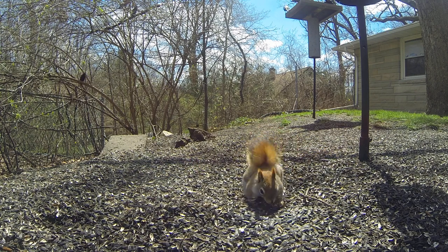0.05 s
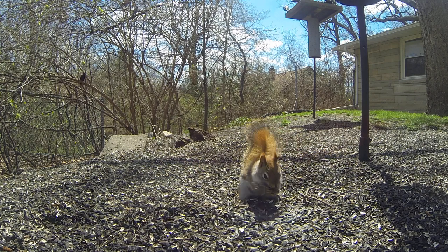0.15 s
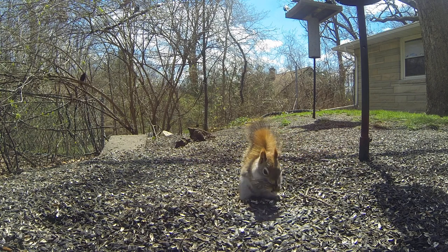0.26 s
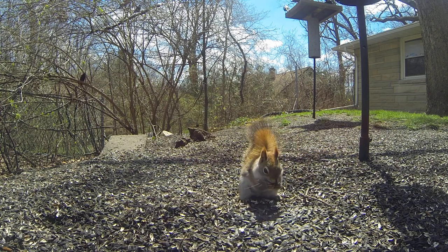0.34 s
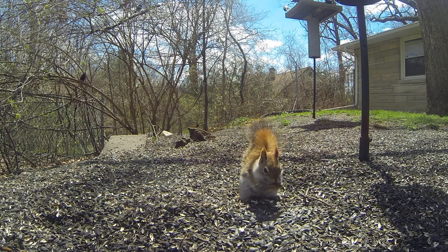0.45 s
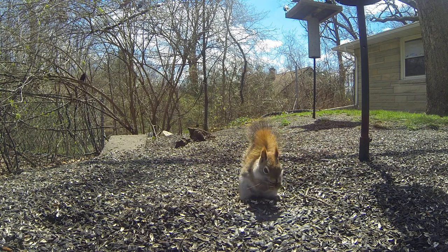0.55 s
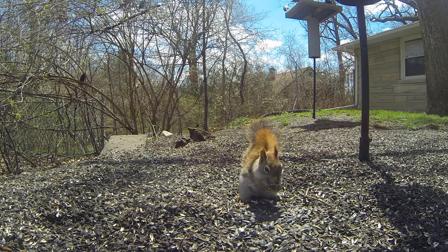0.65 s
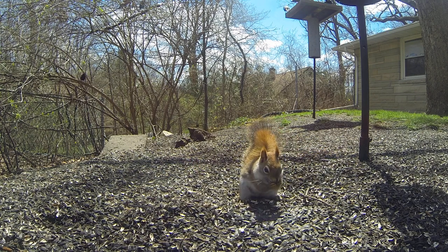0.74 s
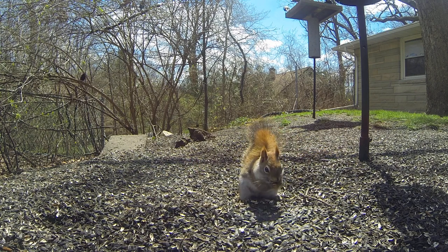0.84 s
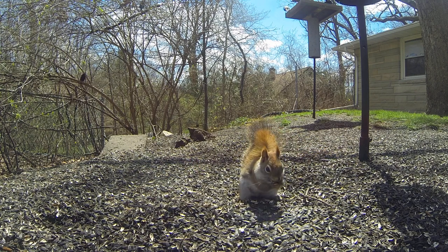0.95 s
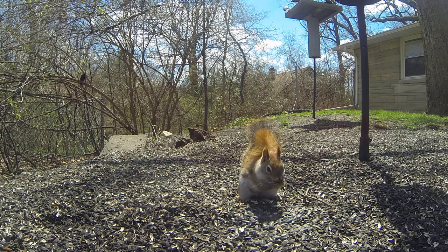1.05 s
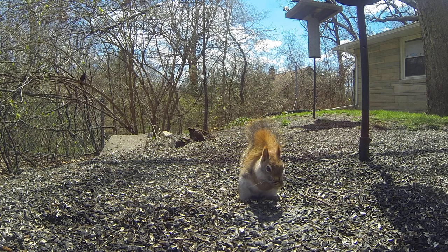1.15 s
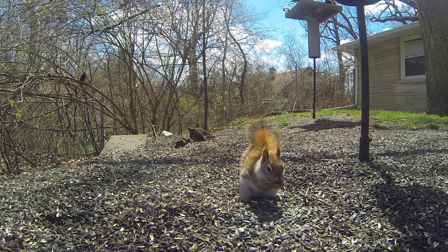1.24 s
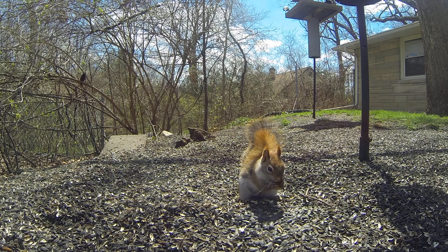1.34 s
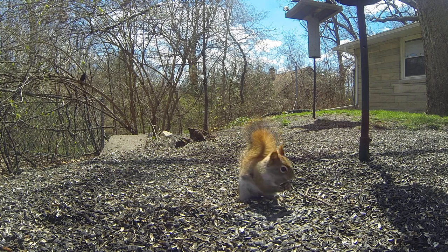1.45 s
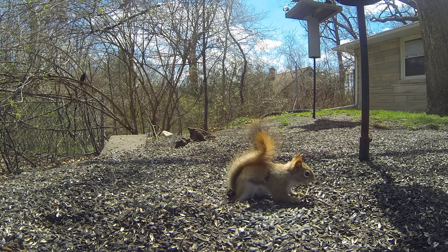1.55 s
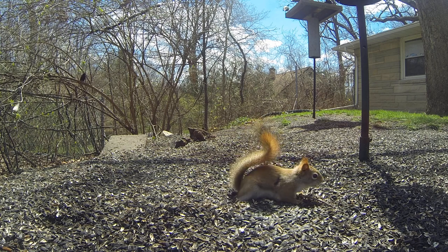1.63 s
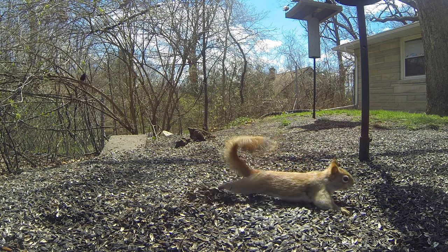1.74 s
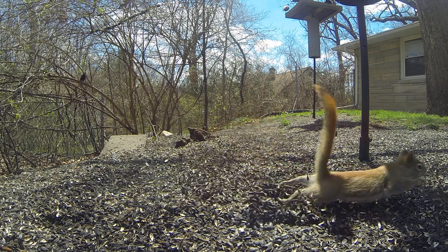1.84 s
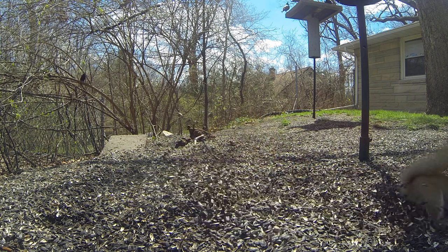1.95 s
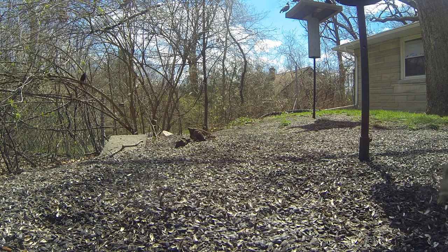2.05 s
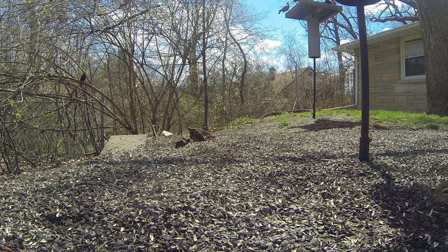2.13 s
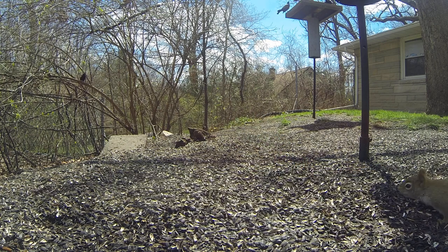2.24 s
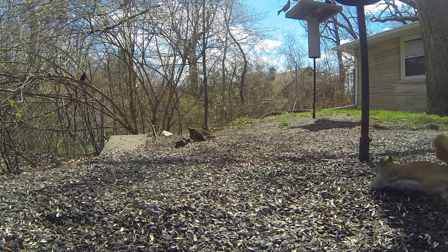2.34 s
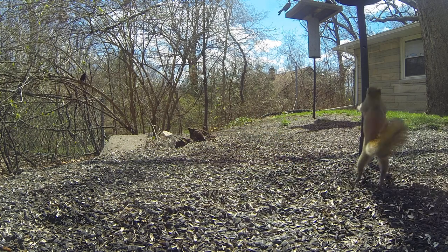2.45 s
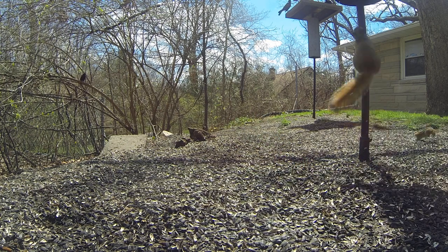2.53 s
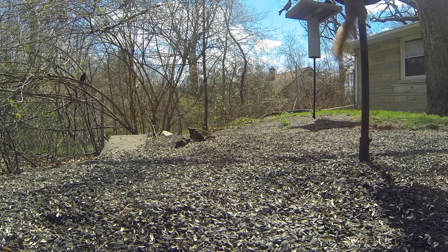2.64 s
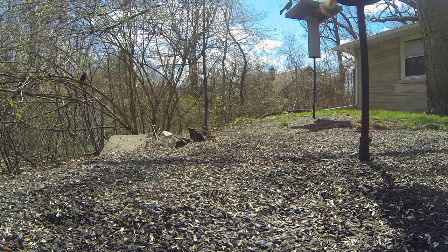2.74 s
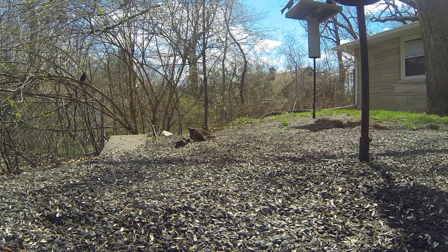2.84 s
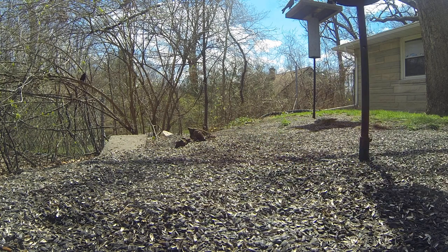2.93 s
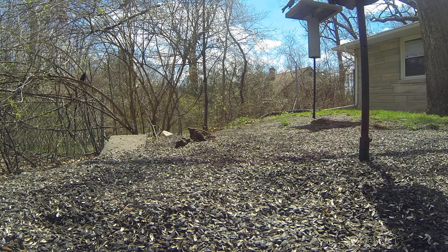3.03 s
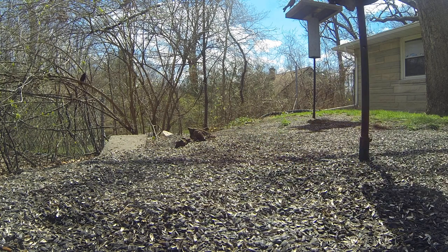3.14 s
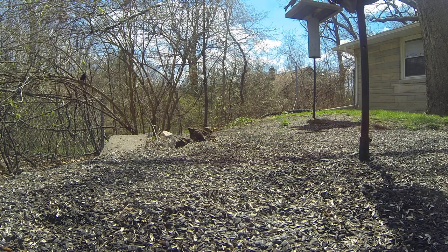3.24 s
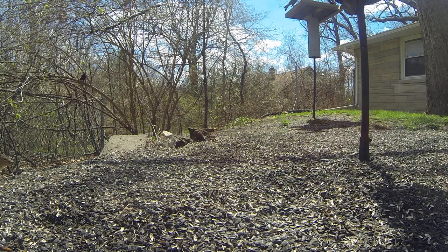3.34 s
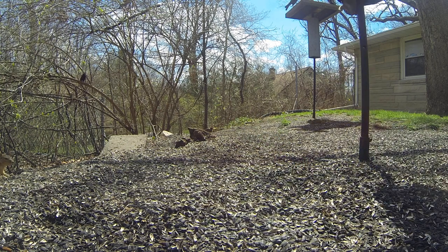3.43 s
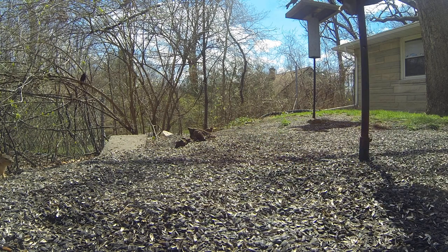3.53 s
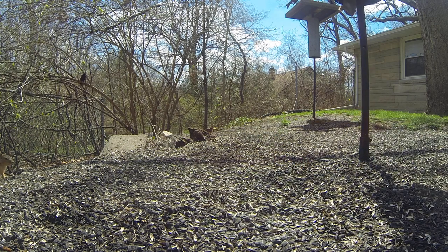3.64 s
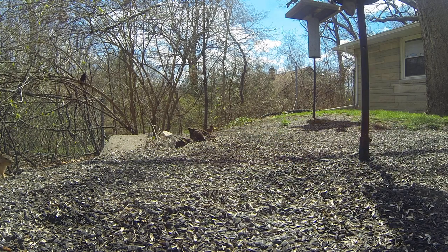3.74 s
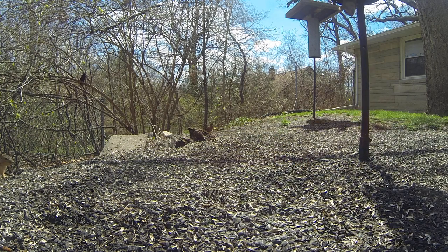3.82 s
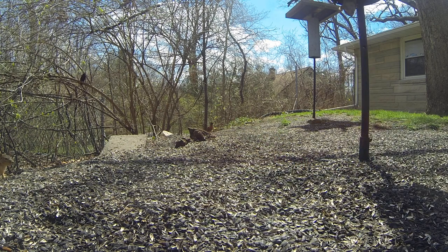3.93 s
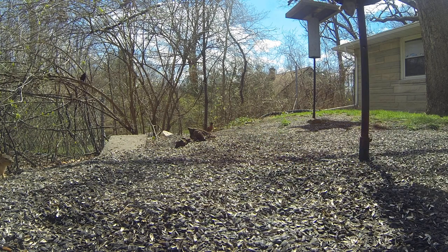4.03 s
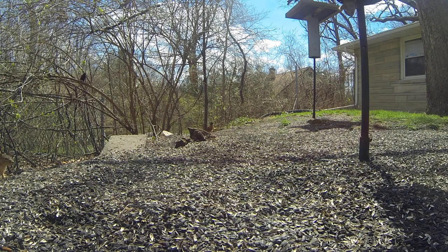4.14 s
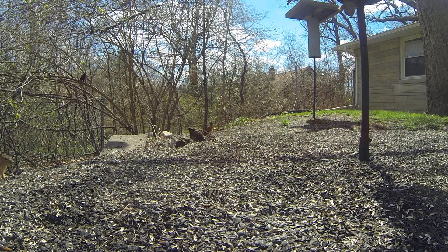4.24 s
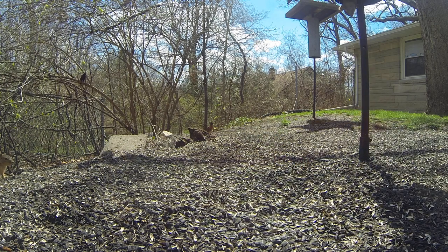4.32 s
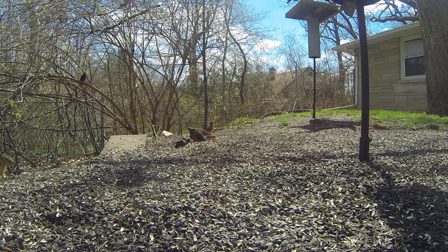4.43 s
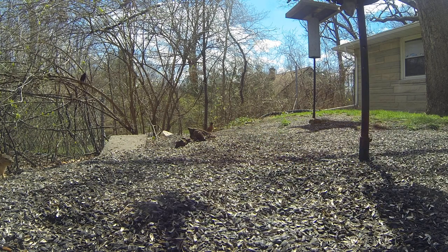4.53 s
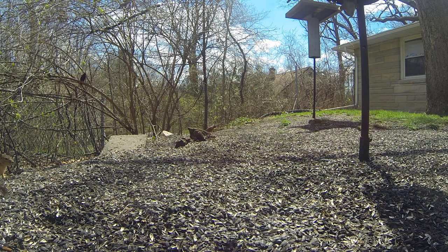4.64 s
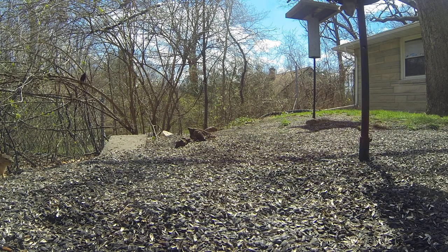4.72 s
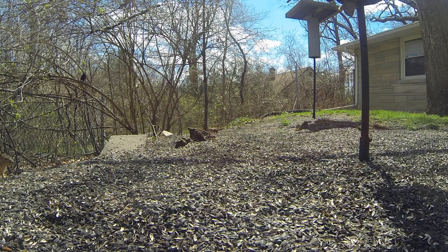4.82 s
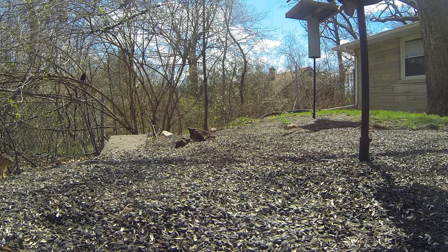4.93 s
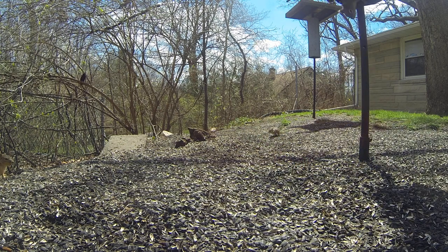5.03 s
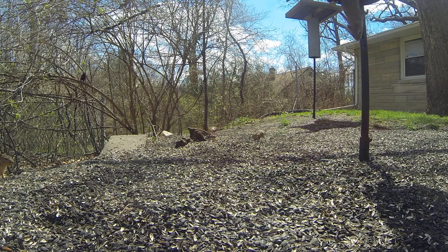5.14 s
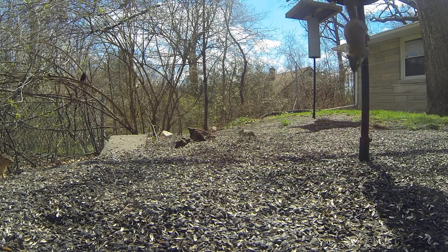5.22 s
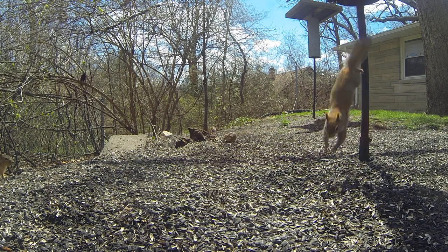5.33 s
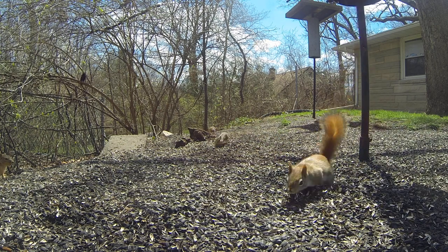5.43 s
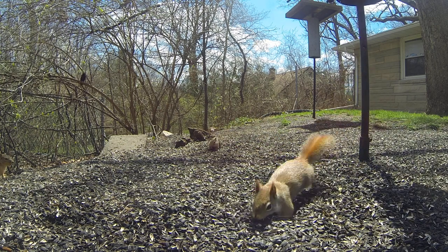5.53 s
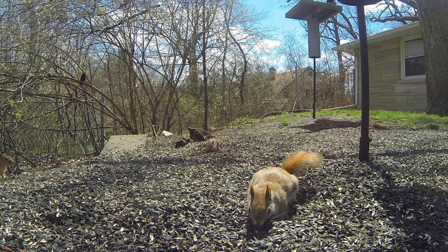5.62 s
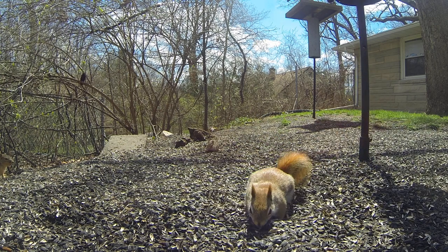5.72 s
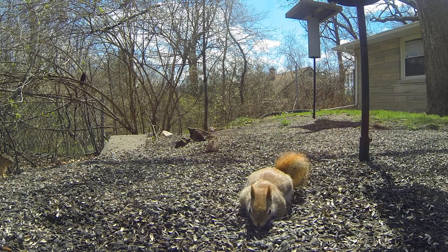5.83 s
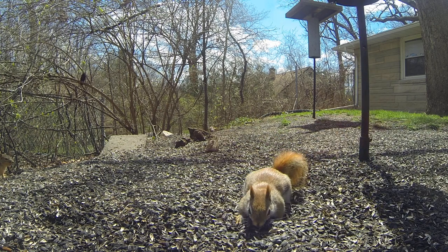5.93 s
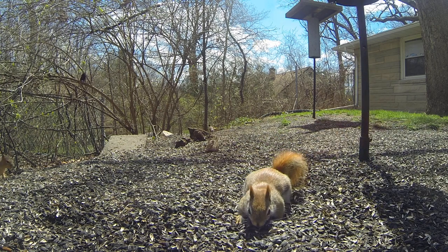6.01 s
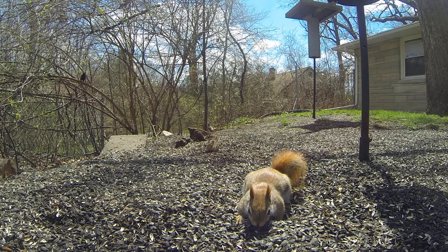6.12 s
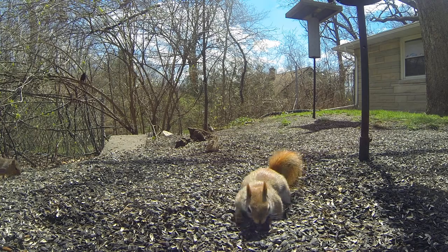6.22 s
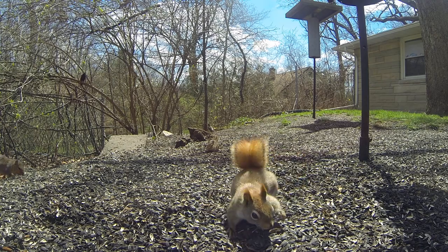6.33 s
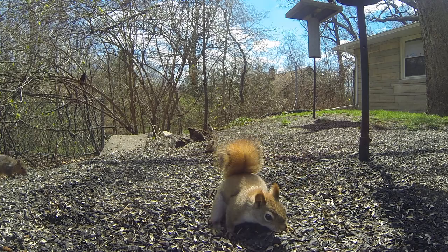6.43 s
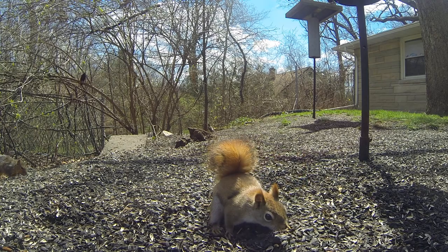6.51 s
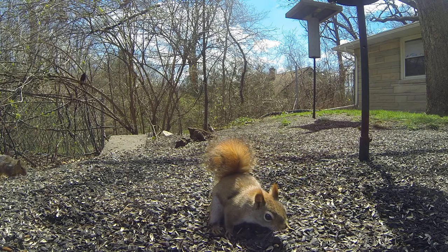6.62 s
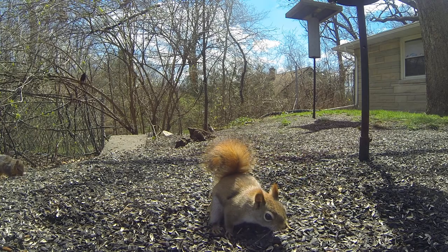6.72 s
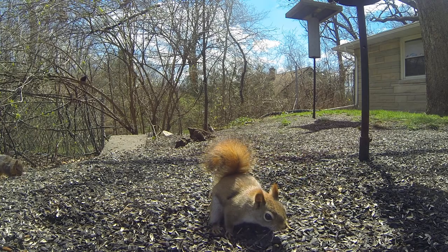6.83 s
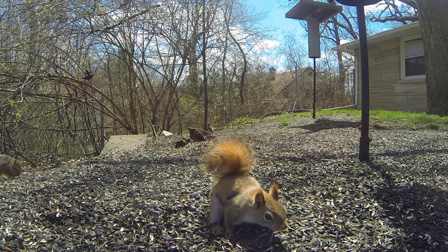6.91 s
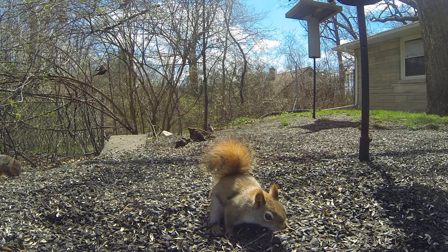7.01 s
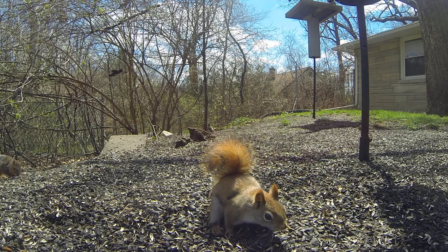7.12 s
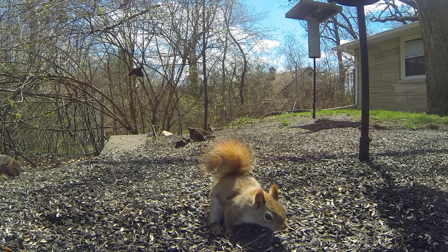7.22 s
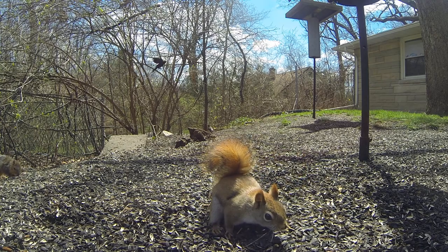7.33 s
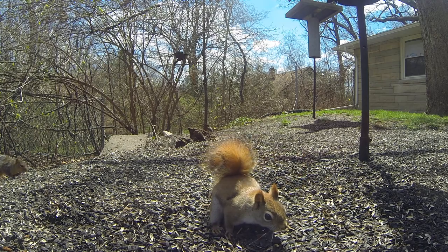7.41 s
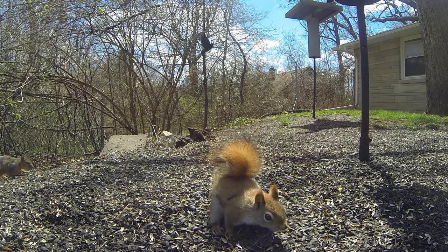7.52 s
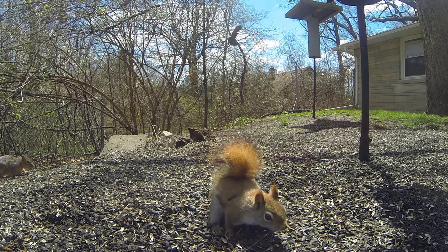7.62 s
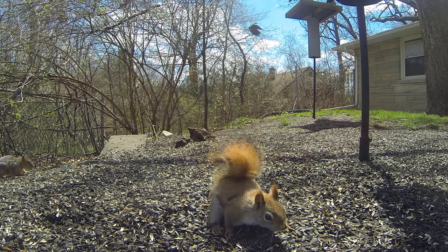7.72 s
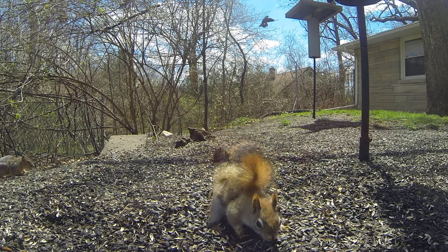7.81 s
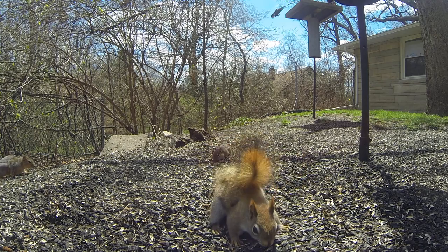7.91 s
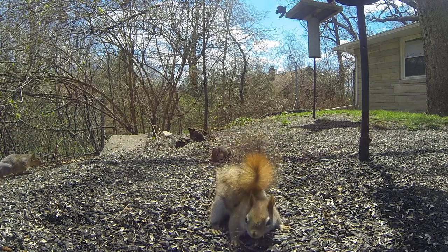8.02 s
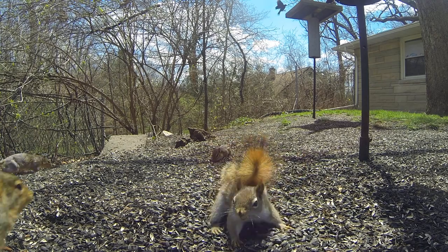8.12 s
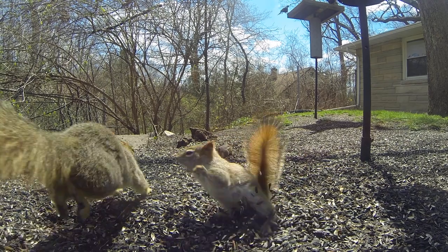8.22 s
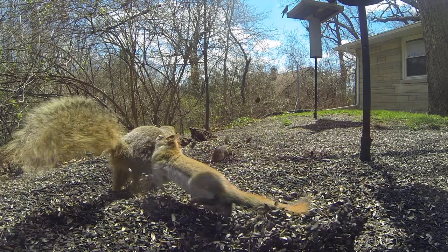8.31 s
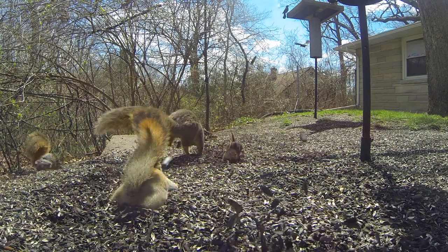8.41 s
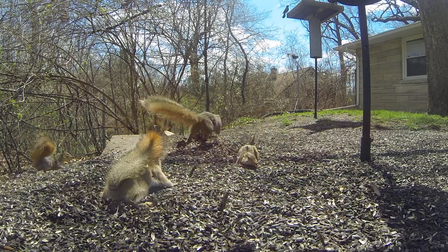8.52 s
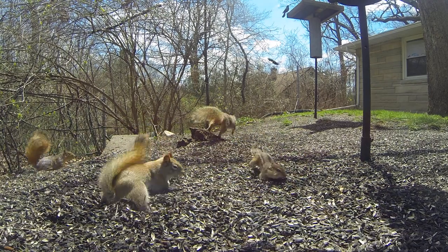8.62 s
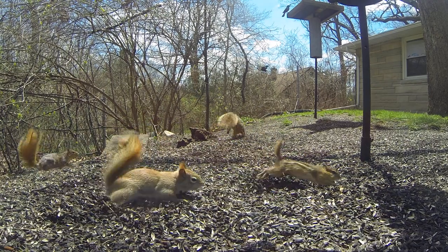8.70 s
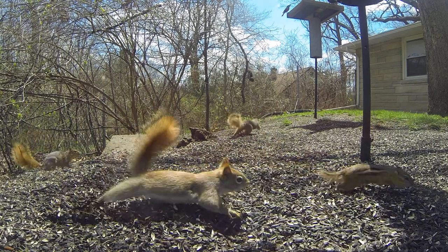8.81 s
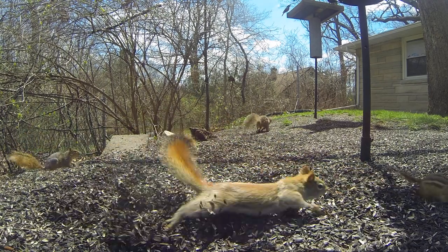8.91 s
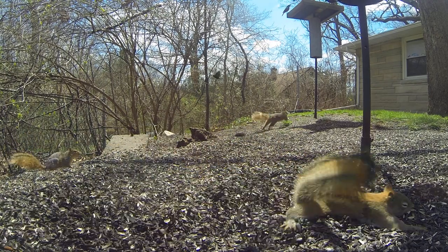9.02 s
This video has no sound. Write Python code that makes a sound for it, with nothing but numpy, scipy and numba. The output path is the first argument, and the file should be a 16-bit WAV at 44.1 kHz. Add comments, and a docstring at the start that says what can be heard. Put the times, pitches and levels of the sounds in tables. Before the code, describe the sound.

Faint hoarse squirrel squeaks and light seed-hull rustling outdoors, broken near the end by an overloaded thump and a clattering paw scramble.

```python
"""A squirrel's soft, wheezy squeaks: grainy noise, a falling whistle and a puff each, with thin whimpers between.
Paws scrape seed hulls (runs of coloured clicks) in front of a small cased camera on the ground in a quiet garden;
one falling seed lands on its lid. A leaping squirrel then knocks the case into overload (a clipped wall flexure),
and paws scramble against it (decaying modes and noise bursts). Air and hiss are coloured noise."""
import sys
import numpy as np
from scipy import signal
from scipy.fft import rfft, irfft
from scipy.io import wavfile
from scipy.ndimage import uniform_filter1d
from numba import njit

SR = 44100
rng = np.random.default_rng(int(sys.argv[2]) if len(sys.argv) > 2 else 0)


def store_pcm(level_fs):
    """Save levels as 16-bit WAV."""
    pcm = np.round(np.clip(level_fs, -1, 1) * 32767).astype(np.int16)
    wavfile.write(sys.argv[1], SR, np.atleast_2d(pcm).T)


N = 399546
TIME = np.arange(N) / SR


def undb(db):
    """Decibels to gain."""
    return 10 ** (np.asarray(db) / 20)


def unit(x):
    """Scale to rms 1."""
    return x / np.sqrt(np.mean(x ** 2) + 1e-30)


def curve(rows, t=TIME):
    """Join (x, value) rows by straight lines."""
    return np.interp(t, *np.transpose(rows))


def clock(length_s):
    """Sample times of a short sound."""
    return np.arange(int(length_s * SR)) / SR


def add(out, start_s, x):
    """Mix x into out from start_s."""
    i = int(start_s * SR)
    first, last = max(i, 0), min(i + len(x), N)
    out[first:last] += x[first - i:last - i]


def colour(x, points, tilt_db=0):
    """Filter x by a (f/Hz, gain/dB) curve, tilted in dB per octave; rms 1."""
    octave = np.log2(np.maximum(np.fft.rfftfreq(len(x), 1 / SR), 1))
    hz, db = np.transpose(points)
    gain = undb(np.interp(octave, np.log2(hz), db) + tilt_db * octave)
    return unit(irfft(rfft(x) * gain, len(x)))


def band(size, hz, width_hz):
    """Noise in a steep-sided resonance; rms 1."""
    f = np.fft.rfftfreq(size, 1 / SR)
    gain = 1 / (1 + ((f - hz) / (width_hz / 2)) ** 4) ** .5
    return unit(irfft(rfft(rng.standard_normal(size)) * gain, size))


def walk(rate_hz, size=N):
    """Smooth random drift with a spread near 1."""
    k = max(int(SR / rate_hz), 1)
    steps = np.repeat(rng.standard_normal(size // k + 1), k)
    return 1.3 * uniform_filter1d(uniform_filter1d(steps, k), k)[:size]


def bell(t, centre_s, sigma_s):
    """A smooth Gaussian swell."""
    return np.exp(-.5 * ((t - centre_s) / sigma_s) ** 2)


def grains(size, rate_hz, spread_db):
    """Random one-sample clicks of uneven strength and either sign."""
    chance, strength = rng.random(size), rng.standard_normal(size)
    sign = rng.choice([-1, 1], size)
    return (chance < rate_hz / SR) * sign * undb(spread_db * strength)


def ring(modes, t, scatter_db, detune):
    """Decaying modes with random signs, weights and detuning per blow; peak 1."""
    hz, db, t60_s = np.transpose(modes)[:, :, None]
    weight, shift = rng.standard_normal((2, len(modes), 1))
    sign = rng.choice([-1, 1], (len(modes), 1))
    decay = np.exp(-np.log(1000) * t / t60_s)
    tone = np.sin(2 * np.pi * hz * (1 + detune * shift) * t)
    y = np.sum(sign * undb(db + scatter_db * weight) * decay * tone, axis=0)
    y = y * (1 - np.exp(-t / 0.00032))  # the contact takes a moment to build
    return y / np.abs(y).max()


def burst(t, spectrum, decay_s):
    """A short coloured noise crack that builds as the surfaces meet."""
    rise = 1 - np.exp(-(t / .0004) ** 2)
    return colour(rng.standard_normal(len(t)), spectrum) * np.exp(-t / decay_s) * rise


# garden air and microphone hiss: f/Hz, relative density/dB
AIR = [(10, -10), (22, 1.5), (50, -1.5), (100, -6.5), (160, -11), (300, -16.5), (600, -22), (1200, -25.5),
       (2000, -30.5), (4000, -36), (6500, -41.5), (9000, -47), (12000, -50), (15000, -58)]
# faint whistling bands in the hiss: f/Hz, width/Hz, level/dB
WHINE = [(5010, 170, -82), (7700, 40, -87.5), (10120, 500, -86.5)]
AIR_RMS_DB = -53


def air():
    """Coloured noise whose low outdoor rumble breathes with the breeze, plus faint whistling bands."""
    bed = colour(rng.standard_normal(N), AIR)
    low = signal.sosfilt(signal.butter(2, 500, fs=SR, output="sos"), bed)
    breeze = low * (undb(1.0 * walk(3.6)) - 1)
    whine = sum(undb(db) * band(N, hz, width_hz) for hz, width_hz, db in WHINE)
    return undb(AIR_RMS_DB) * (bed + breeze) + whine


# buffeting on the case as the animals come close: t/s, level/dB
BUFFET = [(7.45, -81), (7.55, -45.5), (7.65, -57), (7.78, -50.5), (7.95, -54.5), (8.1, -57), (8.2, -79.5)]


def buffet():
    """Low noise that swells and dips on the case."""
    return undb(curve(BUFFET)) * band(N, 42, 60)


# bouts of feet on the hulls: t/s, length/s, initial level/dB before edge and flutter
MOVES = [(0.1, 1.5, -80), (1.76, 0.26, -70), (2.08, 0.42, -77), (5.5, 1.1, -79), (7.5, 0.87, -77),
         (8.11, 0.045, -64), (8.255, 0.48, -68.5), (8.87, 0.25, -70)]
# hull rustle: f/Hz, relative level/dB
RUSTLE_COLOUR = [(2000, -6.5), (4500, -2.5), (6500, -2.5), (8200, -3.5), (9800, -6), (11500, 1),
                 (13500, -8.5), (15000, -6)]
MOVE_FADE_DB, MOVE_EDGE_S = 8.5, 0.03  # fade over each bout; rise and fall time


def rustle():
    """Hulls shift and tick under the feet: fluttering clicks, each bout fading."""
    effort = np.zeros(N)
    for start_s, length_s, db in MOVES:
        t = clock(length_s)
        edges = np.clip(np.minimum(t, length_s - t) / MOVE_EDGE_S, 0, 1)
        add(effort, start_s, undb(db - MOVE_FADE_DB * t / length_s) * edges)
    return effort * undb(3.6 * walk(30)) * colour(grains(N, 3000, 3.5), RUSTLE_COLOUR)


def strokes(table, spectrum, rate_hz, spread_db):
    """Each stroke is a dense run of hull clicks that starts fast and dies away."""
    out = np.zeros(N)
    for start_s, length_s, db, tilt_db in table:
        t = clock(length_s * 2)
        shape = (1 - np.exp(-t / (0.054 * length_s))) / (1 + (t / (0.94 * length_s)) ** 8)
        clicks = colour(grains(len(t), rate_hz, spread_db), spectrum, tilt_db)
        add(out, start_s, undb(db) * shape * clicks)
    return out


# single hulls cracking: t/s, length/s, level/dB before envelope, tilt/(dB/octave)
CRACKS = [(.705, 0.017, -58.5, -3.5), (3.212, 0.013, -57, -4.5), (5.24, 0.017, -57, -5)]
# crack spectrum: f/Hz, relative level/dB
CRACK_COLOUR = [(800, -31.5), (1900, -14), (2300, -10), (2750, 8), (3100, -14), (3500, -12), (4200, -30),
                (15000, -75)]


def cracks():
    """Single hulls crack with a short pip: clicks through a narrow spectral peak."""
    return strokes(CRACKS, CRACK_COLOUR, rate_hz=3300, spread_db=1.5)


# dry hulls snapping and skidding: t/s, length/s, level/dB before envelope, tilt/(dB/octave)
CRUNCHES = [(1.91, 0.068, -67, 11), (4.36, .038, -56.5, -5.5), (7.86, 0.026, -48.5, -1.5),
            (7.942, 0.028, -48.5, 2)]
# crunch spectrum: f/Hz, relative level/dB
CRUNCH_COLOUR = [(500, -27), (1400, -10), (2200, -13.5), (3000, 3.5), (3900, 7), (5500, -4.5), (7000, -28),
                 (11000, -24.5), (13500, -10), (15000, -24)]


def crunches():
    """Dry hulls snap and skid: dense clicks of very uneven strength."""
    return strokes(CRUNCHES, CRUNCH_COLOUR, rate_hz=4000, spread_db=5)


# paws scraping through hulls: t/s, length/s, level/dB before envelope, tilt/(dB/octave)
SCRAPES = [(1.766, 0.037, -50.5, 2), (1.81, .04, -65, 0), (2.051, 0.013, -54, -3.5), (3.96, 0.25, -67, 0.5),
           (4.327, 0.035, -45.5, 2.5), (4.585, 0.041, -61.5, 3.5), (8.214, 0.04, -36.5, -6.5),
           (8.3, .028, -48, -7), (8.352, 0.023, -50, -10), (8.398, .028, -50, -7.5)]
# scrape spectrum: f/Hz, relative level/dB
SCRAPE_COLOUR = [(300, -32), (900, -23), (1300, 5), (1600, 2), (1800, -11), (2150, -2), (2750, -1),
                 (3800, -3.5), (4400, -24), (5900, -24), (6700, -15.5), (8500, -36), (15000, -42)]


def scrapes():
    """Paws drag through the hulls: each stroke sets off a run of clicks."""
    return strokes(SCRAPES, SCRAPE_COLOUR, rate_hz=3000, spread_db=3.0)


# modes of the case lid: f/Hz, relative level/dB, t60/s before extra damping
LID_MODES = [(236, -4.5, 0.11), (826, -4.5, 0.059), (1190, -20, 0.14), (1450, -1.5, 0.045),
             (1650, -1.5, 0.067), (2326, -12, 0.062), (2540, -25, 0.14), (3250, 0, 0.036),
             (3537, -23, 0.033), (3870, -13, 0.037)]
# slap of surfaces, also played by knock(): f/Hz, relative level/dB
SLAP = [(200, -7.5), (1400, 1), (2000, -1.5), (3000, -1), (4000, -15.5), (6500, -26), (9000, -46.5),
        (15000, -55.5)]
DROP_S, DROP_DRIVE_DB = 4.728, -27.5


def drop():
    """A lone seed lands on the lid with a hollow tock: damped modes and a noise burst."""
    out, t = np.zeros(N), clock(0.18)
    tock = ring(LID_MODES, t, scatter_db=0.0, detune=0) * np.exp(-t / 0.033)
    tick = undb(-10.0) * burst(t, SLAP, decay_s=0.0045)
    add(out, DROP_S, undb(DROP_DRIVE_DB) * (tock + tick))
    return out


# case modes by family (RING_MODES also in knock()): f/Hz, relative level/dB, t60/s
THUD_MODES = [(223.6, 0.5, 0.074), (380, 0.5, 0.049), (457, -4, 0.06), (774, -11, .02), (836, -6.5, .04)]
RING_MODES = [(1168, -11.5, 0.06), (1350, -4, 0.028), (1473, 4, 0.039), (1706, 1, 0.038),
              (2125, -10, 0.046), (2230, -15.5, 0.031)]
EDGE_MODES = [(2610, -3.5, .02), (2830, 1, .03), (3060, 0, .02), (3240, -0.5, 0.023), (3470, -13, .02),
              (3670, -12.5, .027), (3940, -10, .02)]
# bare claw tick: f/Hz, relative level/dB
TICK = [(300, -18.5), (1000, 4), (3800, 3.5), (4400, -20), (6200, -11.5), (7200, -31), (10000, -35),
        (15000, -45)]
# dull, dense case body: f/Hz, relative level/dB
BODY = [(100, -4), (220, -1.5), (480, 0.5), (650, -12.5), (850, -1.5), (1000, -14), (1400, -4.5),
        (1800, -4), (2400, -15), (4000, -30), (6000, -58.5)]
# contact balance: hardness/(0-1), gain/dB before the trims in contact()
THUD_BY_HARDNESS = [(0, 3.5), (0.5, -12), (1, -15)]
EDGE_BY_HARDNESS = [(0, -23.5), (0.3, -19.5), (0.75, -6.5), (1, -1.5)]


def contact(hardness):
    """A touch excites three mode families, a tick and a dull body; harder is brighter, with less thud."""
    t = clock(0.24)
    thud_db, edge_db = curve(THUD_BY_HARDNESS, hardness), curve(EDGE_BY_HARDNESS, hardness)
    thud = undb(thud_db - 2.5) * ring(THUD_MODES, t, scatter_db=3, detune=0.025)
    wall = ring(RING_MODES, t, scatter_db=3, detune=.012)
    edge = undb(edge_db) * ring(EDGE_MODES, t, scatter_db=1.5, detune=0.016)
    tick = undb(edge_db - 9.5) * burst(t, TICK, decay_s=.0035)
    body = undb(thud_db - 6) * burst(t, BODY, decay_s=0.0067)
    return thud + wall + edge + tick + body


# paws hitting the case: t/s, wall ring level/dB, hardness/(0 soft pad - 1 bare claw)
TAPS = [(8.138, -28, 0.35), (8.3138, -43.5, 0.17), (8.404, -47.5, 0.23), (8.4838, -26.5, 0.95),
        (8.5003, -28, 0.65), (8.5056, -20, 0.86), (8.516, -14.5, 0.3), (8.5419, -16.5, 0.35),
        (8.5748, -21.5, 0.75), (8.5825, -27, 0.7), (8.5949, -8, 0.59), (8.608, -22.5, 0.78),
        (8.636, -40.5, 0.45), (8.659, -38, 0.67), (8.6773, -20, 0.87), (8.749, -43, 1)]
PAD_LAG_S, PAD_DB, PAD_SOFTER = 0.0036, -3, 0.15  # pad against claw


def taps():
    """Every paw meets the case twice: first the claw, then the weaker, softer pad."""
    out = np.zeros(N)
    for start_s, db, hardness in TAPS:
        add(out, start_s, undb(db) * contact(hardness))
        add(out, start_s + PAD_LAG_S, undb(db + PAD_DB) * contact(hardness - PAD_SOFTER))
    return out


# pushes along the ground: t/s, level/dB
SHOVE = [(8.11, -44), (8.16, -31.5), (8.32, -41), (8.52, -43), (8.6, -39.5)]
# sliding noise: f/Hz, relative level/dB
SHOVE_COLOUR = [(20, -4.5), (70, 2.5), (140, -10.5), (230, 2), (330, -14.5), (500, -18), (900, -25),
                (1600, -25), (4000, -57.5)]
SHOVE_ATTACK_SIGMA_S, SHOVE_RELEASE_S = 0.012, 0.04


def sliding():
    """Pushed, the case grinds over the ground and comes to rest: noise scaled by speed."""
    speed = np.zeros(N)
    for push_s, db in SHOVE:
        rise = bell(TIME, push_s, SHOVE_ATTACK_SIGMA_S)
        fall = np.exp(-np.abs(TIME - push_s) / SHOVE_RELEASE_S)
        speed += undb(db) * np.where(TIME < push_s, rise, fall)
    return speed * colour(rng.standard_normal(N), SHOVE_COLOUR)


# hum of the case on its mount: f/Hz, relative level/dB, t60/s
MOUNT_MODES = [(225.5, 1, 0.14), (265, -5.5, 0.11), (345, -9.5, .07), (468, 1, 0.094), (550, -8, .1)]
KNOCK_S, KNOCK_HZ, KNOCK_SIGMA_S = 8.1442, 104, .00102
KNOCK_DRIVE_DB = 24  # sine level before the push window and clipping
ROCK_S, ROCK_SIGMA_S, ROCK_HZ, ROCK_DB = 8.297, .065, 27, -30


def knock():
    """A body hits the case: its wall flexes in and out once and slaps back; the case hums and rocks."""
    t = clock(.3)
    push = bell(TIME, KNOCK_S + KNOCK_SIGMA_S / 2, KNOCK_SIGMA_S)
    flex = -undb(KNOCK_DRIVE_DB) * push * np.sin(2 * np.pi * KNOCK_HZ * (TIME - KNOCK_S))
    rebound = undb(9.5) * np.sin(2 * np.pi * 167 * t) + undb(-3.0) * np.sin(2 * np.pi * 470 * t)
    rebound = rebound * np.exp(-t / 0.0025)
    slap = undb(2.5) * burst(t, SLAP, decay_s=0.002)
    hum = undb(-10.0) * ring(MOUNT_MODES, t, scatter_db=0, detune=0)
    wall = undb(-7) * ring(RING_MODES, t, scatter_db=2, detune=.01)
    add(flex, KNOCK_S + .0029, rebound + slap + hum + wall)
    sway = bell(TIME, ROCK_S, ROCK_SIGMA_S)
    rocking = -undb(ROCK_DB) * sway * np.cos(2 * np.pi * ROCK_HZ * (TIME - ROCK_S))
    return flex + rocking


# drawn-out whimpers: t/s, length/s, start f/Hz, level/dB, undertone against note/dB
WHIMPERS = [(0.834, 0.055, 1620, -61.5, -25), (0.87, 0.068, 1310, -57, -25), (1.088, 0.11, 1327, -59, -25),
            (2.589, 0.06, 1300, -58.5, -25), (3.453, 0.053, 1530, -63, -25),
            (3.967, 0.04, 1580, -59.5, -25), (4.496, 0.041, 1415, -62, -25), (5.4, 0.036, 1525, -57, -25),
            (5.546, 0.044, 1322, -57.5, -9), (5.705, 0.046, 1330, -59, -11), (5.878, 0.079, 1340, -62, -1),
            (6.093, 0.054, 1306, -61.5, -16), (6.31, 0.05, 1320, -62, -4), (7.981, 0.073, 1320, -58.5, -25)]
WHIMPER_SAG, UNDERTONE_RATIO = 0.1, 0.55  # share of pitch lost; undertone f / note f


def whimpers():
    """Thin, hoarse notes: jittered sines that sag in pitch, each over a lower undertone, often faint."""
    out = np.zeros(N)
    for start_s, length_s, start_hz, db, undertone_db in WHIMPERS:
        t = clock(length_s)
        hz = start_hz * (1 - WHIMPER_SAG * t / length_s)
        hz = hz + 70 * walk(400, size=len(t))
        flutter = undb(3 * walk(250, size=len(t)))
        phase = 2 * np.pi * np.cumsum(hz) / SR
        note = np.sin(phase) + undb(undertone_db) * np.sin(UNDERTONE_RATIO * phase)
        add(out, start_s, undb(db) * unit(flutter * note * np.sin(np.pi * t / length_s)))
    return out


# evenly paced runs: first t/s, last t/s, count, first level/dB, last level/dB
SQUEAK_RUNS = [(0.0, 0.257, 3, -60.5, -58.5), (0.44, 0.825, 4, -56.5, -57.5), (0.956, 1.664, 6, -55, -54.5),
               (1.79, 2.273, 4, -54, -53.5), (2.406, 2.878, 4, -59.5, -53.5), (3.07, 3.763, 5, -55.5, -56),
               (3.922, 4.602, 5, -54.5, -60.5), (4.763, 5.676, 7, -58.5, -56.5),
               (5.844, 6.488, 5, -57.5, -59), (6.691, 6.858, 2, -60.5, -65), (7.137, 7.549, 3, -60, -55),
               (7.465, 7.72, 2, -64.5, -61.5), (7.779, 7.963, 3, -54, -50.5), (8.795, 9.048, 2, -55, -54)]


def squeak_beats():
    """Time and level of every squeak: within a run the pace is steady and the level ramps."""
    return np.vstack([np.linspace((first_s, first_db), (last_s, last_db), round(count))
                      for first_s, last_s, count, first_db, last_db in SQUEAK_RUNS])


# hoarseness of the voice: t/s, wheeze against whistle/dB
HOARSENESS = [(0, -6), (1.1, -2.5), (3, -9), (4.3, -9), (5.1, -5), (6.5, -8), (9, -8.5)]
# air hiss, strongest when the animal faces the case: t/s, gain/dB before HISS_TRIM_DB
FACING = [(0, -28), (.55, -13), (.7, -10.5), (2.3, -12), (2.8, -20), (7.3, -29), (7.6, -14), (9, -13)]
HISS_TRIM_DB, PUFF_DB = -6.5, -6.5
SQUEAK_HZ, SQUEAK_FALL_PER_S, SQUEAK_JITTER = 1258, 6.5, 0.0613  # nominal f, relative fall, roughness
SQUEAK_SCATTER_DB, SQUEAK_LENGTH_SCATTER = 0.5, 0.15  # squeak to squeak; the latter stretches the whistle


def squeaks():
    """Each squeak is an abrupt grainy wheeze, a rough falling whistle, and a weaker puff after it."""
    out, t = np.zeros(N), clock(.14) - .07
    for beat_s, db in squeak_beats():
        pitch, glide, lag, strength, effort, length = rng.standard_normal(6)
        stretched = t / np.exp(SQUEAK_LENGTH_SCATTER * length)
        flutter = undb(3 * walk(400, size=len(t)) - 1)
        fall = (SQUEAK_FALL_PER_S + 3 * glide) * t
        hz = SQUEAK_HZ * np.exp(.02 * pitch - fall + SQUEAK_JITTER * walk(500, size=len(t)))
        swell = bell(stretched, 0, 0.0066) + 0.5 * bell(stretched, 0.0083, 0.01)
        whistle = np.sqrt(2) * np.sin(2 * np.pi * np.cumsum(hz) / SR) * swell
        flow = np.clip((t + 0.027) / 0.0044, 0, 1) * bell(t, -0.016, 0.021)
        wheeze = (band(len(t), 1536, 350) + 0.93 * band(len(t), 1240, 420)) * flow * flutter
        puff = undb(3.7 * strength) * band(len(t), 1430, 380) * bell(t, .027 + 0.0057 * lag, 0.0074)
        hiss = (band(len(t), 8000, 3900) + 1.2 * band(len(t), 3800, 2600)) * flow
        voice = whistle * flutter + undb(curve(HOARSENESS, beat_s)) * wheeze
        breath = undb(PUFF_DB) * puff + undb(curve(FACING, beat_s) + HISS_TRIM_DB) * hiss
        add(out, beat_s + t[0], undb(db + SQUEAK_SCATTER_DB * effort) * (voice + breath))
    return out


def scene():
    """Everything that reaches the microphone."""
    background = air() + buffet()
    hulls = rustle() + cracks() + crunches() + scrapes()
    case = drop() + taps() + sliding() + knock()
    return (background + hulls + case + whimpers() + squeaks())[None]


@njit
def follow(x, attack, release):
    """Peak follower with separate rise and fall coefficients."""
    env, e = np.empty(len(x)), 0.
    for i in range(len(x)):
        e += (x[i] - e) * (attack if x[i] > e else release)
        env[i] = e
    return env


TOP_HZ = 15300


def record(dry):
    """Gain control ducks too late for the knock, which clips softly; a steep low-pass cuts the top."""
    attack_s, release_s, ceiling = .007, .09, .7
    env = follow(np.abs(dry[0]), 1 / (attack_s * SR), 1 / (release_s * SR))
    ducked = dry / np.maximum(env / ceiling, 1)
    clipped = ducked / (1 + ducked ** 4) ** (1 / 4)
    return signal.sosfilt(signal.ellip(8, .2, 70, TOP_HZ, fs=SR, output="sos"), clipped)


dry = scene()
out = record(dry)
store_pcm(out)
```